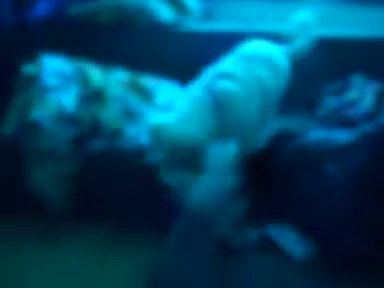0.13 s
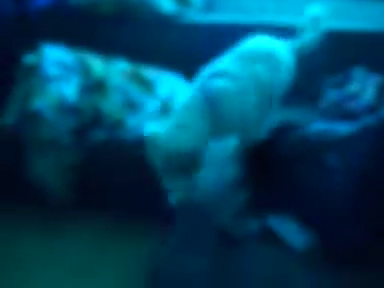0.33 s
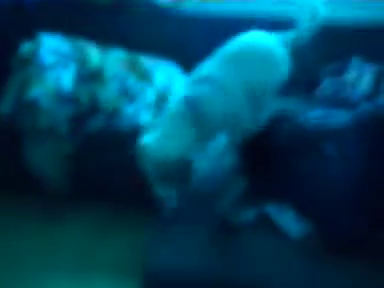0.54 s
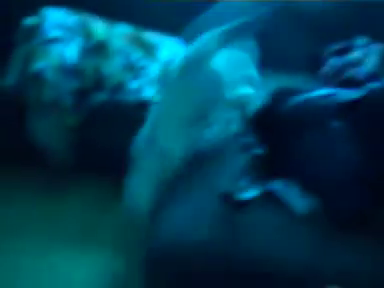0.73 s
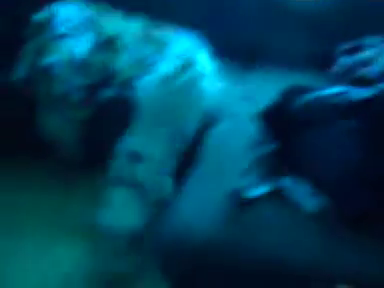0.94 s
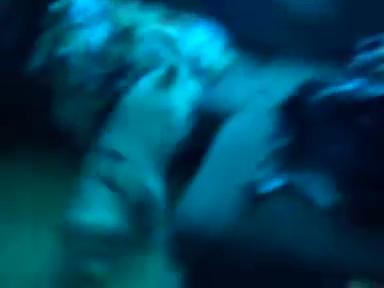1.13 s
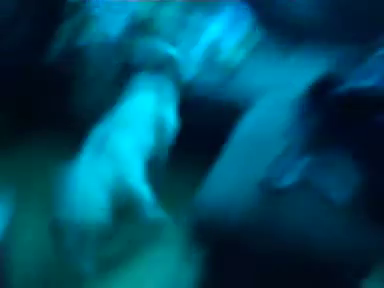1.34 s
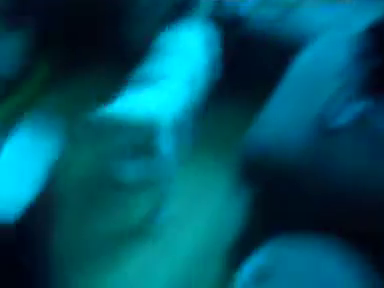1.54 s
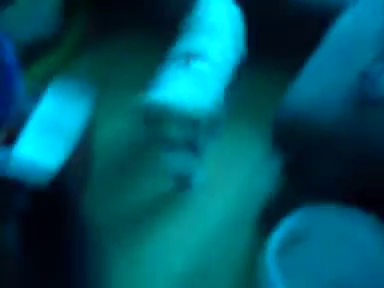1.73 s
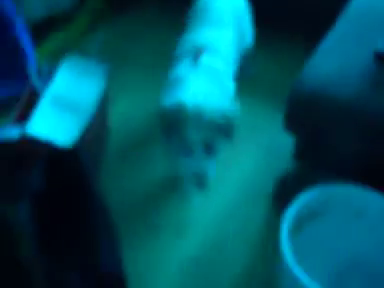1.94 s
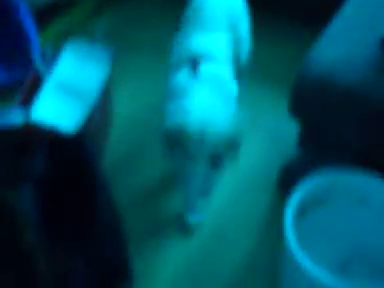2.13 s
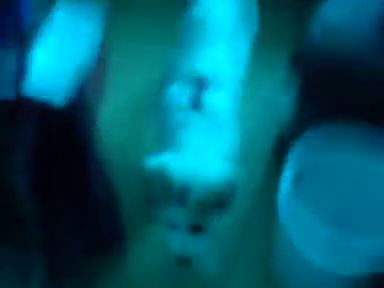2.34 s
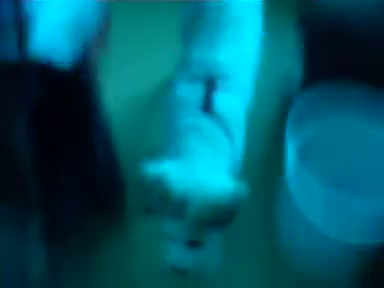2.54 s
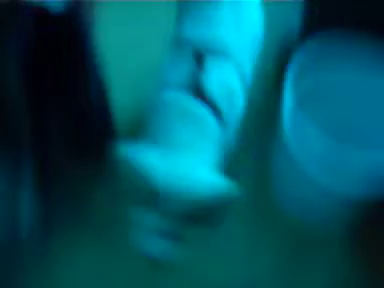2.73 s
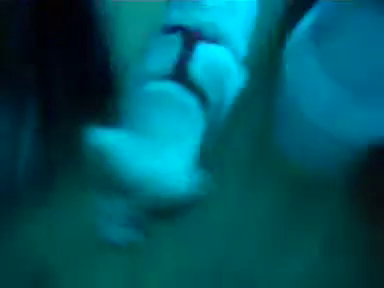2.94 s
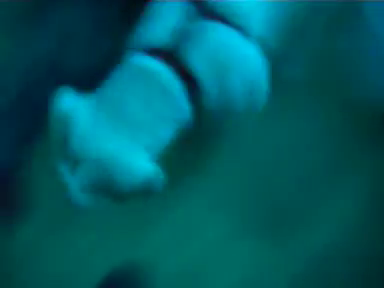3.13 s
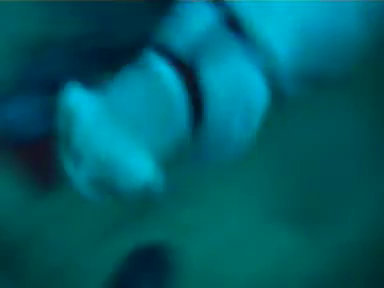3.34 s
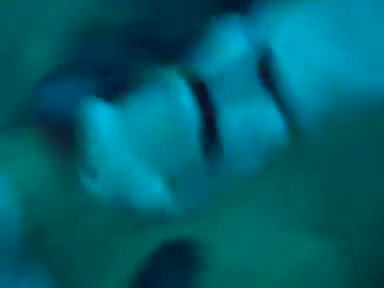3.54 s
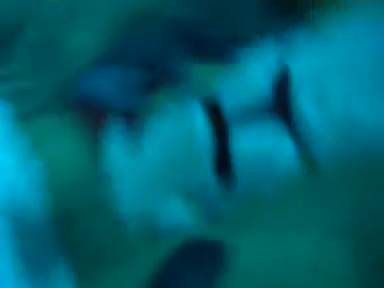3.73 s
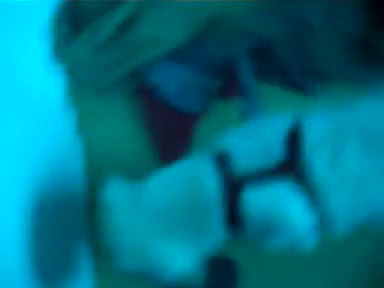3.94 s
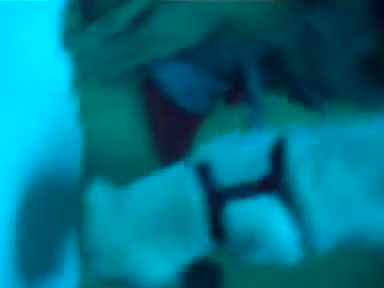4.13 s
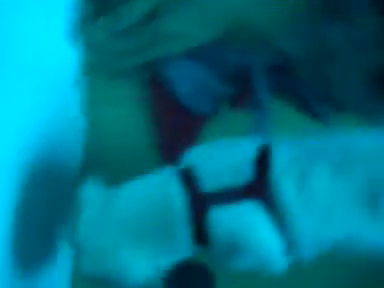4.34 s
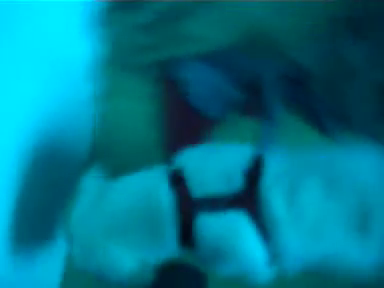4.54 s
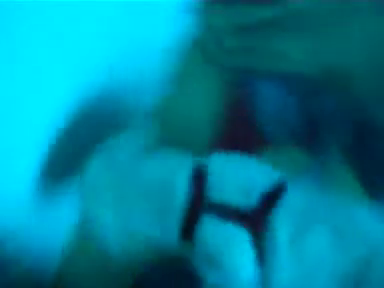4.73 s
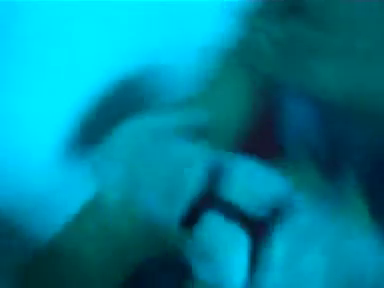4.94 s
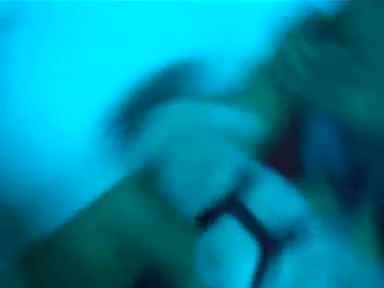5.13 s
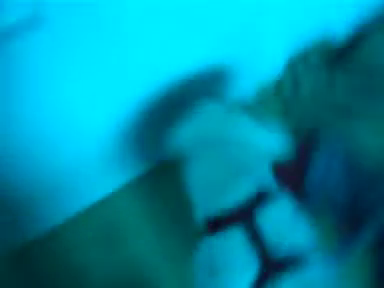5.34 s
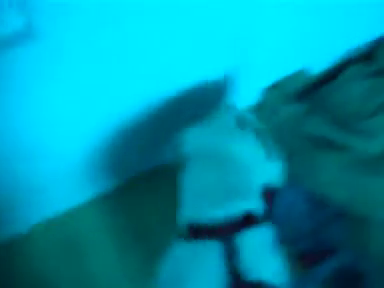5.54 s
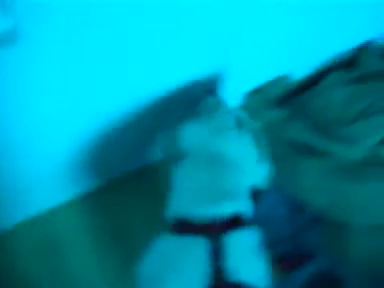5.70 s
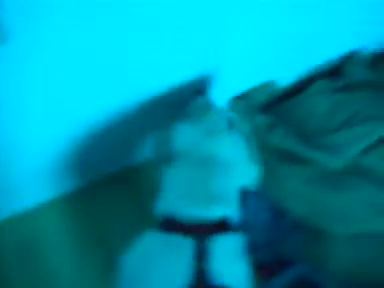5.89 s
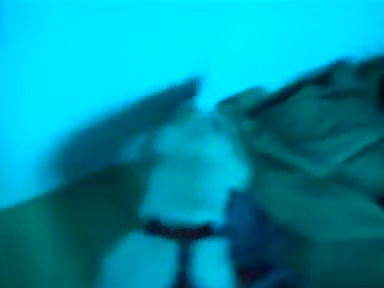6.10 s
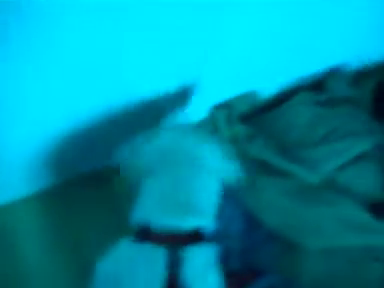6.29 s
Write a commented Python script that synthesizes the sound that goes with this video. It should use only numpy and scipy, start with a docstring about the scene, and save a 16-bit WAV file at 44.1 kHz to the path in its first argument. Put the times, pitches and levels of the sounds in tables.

```python
"""A small dog in a harness scrambles off a sofa, lands on a hard floor and patters about; later it snuffles three times.
Claws and taps are short bursts of noise; thuds, buckle and the knocked recorder case are sums of fading sines.
Cloth, fur and cushion are grainy noise shaped by the dog's motion; snuffles are fluttering noise puffs.
Beneath them lie a faint room hiss, wavering whines and short narrow whirrs."""
import sys
import numpy as np
from scipy import signal
from scipy.fft import rfft, irfft, next_fast_len
from scipy.io import wavfile
from scipy.ndimage import uniform_filter1d

SR = 44100
rng = np.random.default_rng(int(sys.argv[2]) if len(sys.argv) > 2 else 0)


def persist_wave(psi):
    """Save psi, clipped to +-1, as 16-bit WAV."""
    counts = np.round(np.clip(psi, -1, 1) * 32767).astype(np.int16)
    wavfile.write(sys.argv[1], SR, np.atleast_2d(counts).T)


N = 280476
TIME = np.arange(N) / SR   # seconds

# All levels in the tables hold before room echo and the final filters. In colours they are relative.
# Hiss of the still room. Each row: frequency in Hz, level in dB.
HISS_COLOUR = [(15, -61), (25, -32), (200, -16.5), (437, -11.5), (645, -12), (1060, -11.5), (1240, -12),
               (1370, -15), (1820, -17.5), (2020, -16), (3980, -23), (5160, -15.5), (5580, -20),
               (10200, -24), (12500, -28.5), (16200, -34), (22000, -120)]
# Faint wavering whines: two last throughout, the higher ones start later.
# Each row: start in seconds, length in seconds, pitch in Hz, waver in Hz, level in dB.
WHINES = [(0, 6.4, 1273, 17.25, -71.5), (0, 6.4, 1141, 70, -69.5), (2.578, 0.43, 4500, 86, -62.5),
          (2.6, 0.12, 3350, 58, -62), (4.405, 2.3, 4520, 80, -70.5), (5.452, 1.3, 5080, 10.5, -70)]
# Faint narrow whirrs that start and stop.
# Each row: start in seconds, length in seconds, centre in Hz, width of each filter pass in Hz, level in dB.
WHIRRS = [(0, 0.36, 5030, 450, -68), (.4, 0.066, 5150, 450, -58), (0.947, 0.805, 2740, 746, -60),
          (1.3, 0.43, 2120, 400, -62), (1.354, 0.088, 5200, 450, -54), (1.807, 0.11, 5170, 448, -57.5),
          (2.05, 0.056, 5230, 450, -72), (2.403, 0.13, 5170, 450, -55.5), (4.9, 0.29, 2860, 300, -75),
          (4.9, .32, 2180, 250, -85)]
# How briskly the body moves. Each row: time in seconds, briskness in dB (compared with an easy pace).
MOTION = [(0.0, -58.5), (0.3, -56.5), (0.83, -50), (1.24, -49), (2.05, -60.5), (2.14, -58.5), (2.55, -52),
          (2.97, -55), (3.28, -52.5), (3.47, -54), (3.72, -52), (3.93, -44.5), (4.13, -46), (4.32, -52),
          (4.52, -57), (4.92, -51.5), (6.02, -64), (6.36, -62.5)]
# The body brushes past cushion and cloth.
# Each row: start in seconds, length in seconds, rustle level in dB, low rub level in dB.
BRUSHES = [(0.292, 0.047, -51.5, -68), (0.344, 0.047, -46, -61), (0.615, 0.021, -47.5, -44),
           (.685, 0.048, -47.5, -63), (0.733, 0.12, -60.5, -50.5), (0.972, 0.066, -51, -66),
           (1.23, 0.034, -60, -49), (2.013, 0.022, -57, -64), (2.205, 0.045, -56, -59),
           (3.888, 0.065, -49.5, -53), (4.256, 0.029, -45, -86), (4.878, 0.21, -61, -77)]
# Tone colour of the low rub on cushions. Each row: frequency in Hz, level in dB.
CUSHION_COLOUR = [(29, -70), (50, -16.5), (112, -14), (205, -14.5), (272, -7.5), (321, -2.5), (519, 1),
                  (630, 2), (851, -15.5), (959, -4.5), (1800, -7), (2340, -22), (3960, -120)]
# Tone colour of the fine fur rustle. Each row: frequency in Hz, level in dB.
FUR_COLOUR = [(470, -21.5), (800, -0.5), (898, -4), (973, -9.5), (1360, -8.5), (1750, -8.5), (2080, -3.5),
              (2740, -3.5), (6640, -0.5), (8950, -13.5), (10500, -14), (12500, -24.5), (16200, -75),
              (22000, -120)]
# The sofa groans briefly as the dog pushes off.
# Each row: start in seconds, length in seconds, pitch in Hz, waver in Hz, level in dB.
GROANS = [(.715, 0.044, 286.5, 12, -55), (.74, 0.02, 383.6, 23, -53), (.772, .028, 583, 26, -50),
          (.81, 0.061, 283, 21, -54)]
# Claws striking the floor. Each row: time in seconds, peak level in dB, tilt in dB per octave.
CLAWS = [(0.9043, -2.5, 8), (0.9107, -8, -4.5), (0.924, -10, -0.5), (1.244, -4, 0.5), (1.256, 2, 4.5),
         (1.2591, -6.5, -4.5), (1.6442, -25.5, -6), (1.7948, -27.5, -3), (2.0185, -23, -5.5),
         (2.2222, -19.5, -5), (2.6261, -29, -5), (2.6698, -26, -5)]
# Tone colour of the claws. Each row: frequency in Hz, level in dB.
CLAW_COLOUR = [(530, -40), (900, -19), (1210, -49), (1400, -18.5), (2290, -18.5), (2830, -14), (3640, -9.5),
               (3980, -6.5), (5470, -3), (5910, 3.5), (8320, -8.5), (8980, -9), (12500, -22.5),
               (16200, -42), (22000, -120)]
# Duller taps of paws and harness. Each row: time in seconds, peak level in dB, tilt in dB per octave.
TAPS = [(0.5267, -33, -1), (0.5837, -29, -2), (1.1285, -23, 3.5), (1.1484, -38, 4), (1.475, -40, -3),
        (2.4072, -39, 1.5), (2.9599, -38, 3.5), (3.9564, -30, 8), (5.1086, -43, 4), (6.0681, -43, 3),
        (6.1922, -46, 1.5), (6.2307, -46, 13)]
# Tone colour of the taps. Each row: frequency in Hz, level in dB.
TAP_COLOUR = [(400, -3), (700, -2), (1200, 0), (2100, -5.5), (2800, -6), (4000, -6), (7000, -10),
              (12500, -31.5)]
# The buckle knocks as the dog gathers itself to jump. Each row: time in seconds, peak level in dB.
BUCKLE_KNOCKS = [(0.5835, -26)]
# Ringing of the buckle. Each row: pitch in Hz, typical level in dB, time to fade by 60 dB in seconds.
BUCKLE_MODES = [(1800, -2, 0.017), (2110, 8, 0.015), (3230, -4, 0.025), (4350, -5, 0.0093)]
# The dog's weight coming down. Each row: time in seconds, peak level in dB.
THUDS = [(0.586, -40.5), (0.8978, -22.5), (0.906, -28), (0.925, -30), (1.1305, -22), (1.248, -32),
         (1.262, -36.5), (1.277, -32), (1.547, -38.5), (6.028, -55)]
# Ringing of the floor under a paw.
# Each row: pitch in Hz, typical level in dB, time to fade by 60 dB in seconds.
FLOOR_MODES = [(151.6, -25, 0.13), (294, -14.5, 0.043), (380, -6, 0.031), (438, -3.5, 0.044),
               (560, 1, 0.015), (660, -5, 0.033), (980, -6, 0.0078)]
# Cloth catches, snaps free and scrapes on.
# Each row: start in seconds, length in seconds, opening scrape level in dB, peak level of the snap in dB.
SCRATCHES = [(3.045, 0.048, -49.5, -28.5), (3.079, 0.084, -39.5, -16.5), (3.17, 0.028, -36, -15),
             (3.207, 0.036, -39.5, -36), (3.254, .013, -47, -26), (3.3234, 0.013, -36.5, -30),
             (3.4046, 0.022, -43, -27), (3.455, 0.015, -41, -32), (3.513, 0.048, -44.5, -32),
             (3.643, 0.033, -42, -31), (3.692, 0.017, -40, -42), (3.765, 0.028, -48, -27),
             (3.8448, 0.028, -45.5, -31), (4.0267, 0.0076, -44, -29), (4.149, 0.031, -45.5, -36)]
# Tone colour of the scratches. Each row: frequency in Hz, level in dB.
SCRATCH_COLOUR = [(180, -31), (300, -16), (397, -25), (443, -5), (587, -3.5), (1320, -13.5), (2050, -4.5),
                  (2880, -14.5), (4130, -1.5), (5640, 1.5), (6490, 5), (12500, -8.5), (16200, -50),
                  (22000, -120)]
# Cloth lies against the microphone and crackles: start in seconds, length in seconds, level in dB.
CLOTH_CONTACT = (3.05, 1.25, -55)
# Knocks on the recorder's case.
# Each row: time in seconds, peak level in dB, tilt in dB per octave, level of the hollow body in dB.
KNOCKS = [(3.7855, -4, -1, -23), (3.9007, -39, 26, -30), (3.9322, -19, 2.5, -45), (4.0705, -20.5, -6, -37),
          (4.0738, -19, -2.5, -22.5)]
# Tone colour of the knocks' crack. Each row: frequency in Hz, level in dB.
KNOCK_COLOUR = [(410, -15), (700, -8.5), (2280, -14), (2870, -13), (3650, -12.5), (4380, 3), (6060, -6.5),
                (7810, -5), (9700, -19), (10600, -13.5), (12500, -17.5), (16200, -49), (22000, -120)]
# Ringing of the hollow case. Each row: pitch in Hz, typical level in dB, time to fade by 60 dB in seconds.
CASE_MODES = [(342, -2, 0.014), (480, 13.5, 0.02), (750, 3, 0.015), (1034, 0.5, 0.018)]
# The dog's snuffles, puff by puff.
# Each row: start in seconds, length in seconds, attack in seconds, air level in dB, throat level in dB.
SNUFFLES = [(4.545, 0.039, 0.0061, -33.5, -35), (4.604, .011, 0.0035, -41.5, -43),
            (4.805, 0.06, .016, -43.5, -50), (5.241, 0.028, 0.014, -36, -50),
            (5.278, 0.064, 0.017, -38, -45)]
# Tone colour of air in the nose. Each row: frequency in Hz, level in dB.
NOSE_COLOUR = [(350, -38), (600, -14), (648, -17), (708, 7.5), (783, -21), (913, -9), (1130, -4),
               (1250, -2), (1700, -4.5), (2430, -8.5), (3460, -4), (3740, -7.5), (5200, -1.5),
               (9820, -15.5), (12500, -26), (16200, -76), (22000, -120)]
# Hollow ringing of the muzzle. Each row: pitch in Hz, rough overall width in Hz, relative level in dB.
MUZZLE_MODES = [(601, 120, 4.5), (720, 94, 4.5), (1060, 350, -2), (1290, 570, -17.5), (1620, 410, -29)]
# How much the two microphone ports differ, before the direct and diffuse parts get their own levels.
# Each row: frequency in Hz, level in dB against what they share.
PORTS = [(300, -46), (3500, -39), (5000, -18.5), (7000, -2.5), (8300, 4.5), (9400, 10.5), (11000, 6.5),
         (12500, -2.5)]
# Balance of the two sides. Each row: frequency in Hz, left minus right in dB.
LEAN = [(60, 1), (130, 0.5), (280, -0.5), (600, 0.5), (1300, -0.5), (2800, 0.5), (6040, -3), (13000, 4)]

EASY_PACE_DB = -54   # briskness of an easy walk
FUR_DB, FUR_FOLLOWS = -56, 0.99   # rustle level at that pace; dB gained per dB of motion
CUSHION_DB, CUSHION_FOLLOWS = -62.5, 0.7   # the same for the low rub
# Seconds each kind of contact takes to fade by 60 dB
CLAW_RING_S, TAP_RING_S, KNOCK_RING_S, SNAG_RING_S = 0.031, 0.027, 0.014, 0.007
SCRATCH_EASES_DB = 4.5   # a scrape fades by this much as its tension is spent
ROCKING_HZ = 440   # above this the case rocks between the ports more than it pushes on both
WALL_CUT_HZ = 6600   # the walls' reflections dull above this
CUTOFF_HZ = 12600   # steep upper limit of the whole sound


def from_db(db):
    """Turn decibels into gain."""
    return 10 ** (np.asarray(db) / 20)


def rms_one(x):
    """Scale a sound to an average (rms) strength of 1."""
    return x / np.sqrt(np.mean(x ** 2) + 1e-20)


def add(track, s, sound):
    """Mix a sound into a track from time s on."""
    start = max(round(s * SR), 0)
    track[start:start + len(sound)] += sound[:N - start]


def filtered(x, order, hz, kind):
    """Plain smooth filter that keeps the lows or the highs."""
    return signal.sosfilt(signal.butter(order, hz, kind, fs=SR, output="sos"), x + 1e-18)


def coloured(x, spectrum, tilt_db=0, size=4096):
    """Filter without pre-echo (minimum phase): follows a spectrum, tilted per octave, falling off outside."""
    octave = np.log2(np.maximum(np.arange(size // 2 + 1), 0.5) * SR / size)
    points, db = np.log2(np.array(spectrum)[:, 0]), np.array(spectrum)[:, 1]
    outside = np.abs(octave - np.clip(octave, points[0], points[-1]))
    tilt = tilt_db * (octave - points.mean())
    level = np.interp(octave, points, db) + tilt - 18 * outside
    # The cepstrum turns the levels into a response that starts at once
    cepstrum = irfft(np.log(from_db(level)))[:size // 2]
    response = irfft(np.exp(rfft(2 * cepstrum, size) - cepstrum[0]))
    return signal.oaconvolve(x, response)[:len(x)]


def resonance(x, hz, width_hz):
    """Let one pitch ring (two poles), with a gain of about 1 on top."""
    r = np.exp(-np.pi * width_hz / SR)
    feedback = [1, -2 * r * np.cos(2 * np.pi * hz / SR), r * r]
    return signal.lfilter(np.array([1, 0, -1]) * (1 - r * r) / 2, feedback, x + 1e-18)


def drift(rate):
    """Slow random wander with a spread near 1: straight lines between rate random points a second."""
    knots = rng.standard_normal(4000)
    return np.interp(TIME * rate, np.arange(len(knots)), knots)


def grains(per_s, spread_db, smooth):
    """Fibres slipping: random tiny clicks of uneven size over a smooth hiss."""
    sizes = from_db(spread_db * np.minimum(rng.exponential(1, N), 4))
    sizes = sizes * rng.choice([-1, 1], N)
    slips = rng.random(N) < per_s / SR
    return rms_one(sizes * slips) + smooth * rng.standard_normal(N)


def strokes(rows, rise_s, fall_s):
    """Loudness shape of strokes (start, length, dB) that swell, hold and die away."""
    total = 0
    for s, length, db in rows:
        swell = 1 + np.tanh((TIME - s) / rise_s)
        fade = 1 - np.tanh((TIME - s - length) / fall_s)
        total = total + from_db(db) * swell * fade / 4
    return total


def tones(rows, edge_s, waver_per_s):
    """Wavering sine tones (start, length, Hz, waver Hz, dB) with soft edges."""
    total = 0
    for s, length, hz, waver, db in rows:
        cycles = np.cumsum(hz + waver * drift(waver_per_s)) / SR
        tone = rms_one(np.sin(2 * np.pi * cycles))
        total = total + strokes([(s, length, db)], edge_s, edge_s) * tone
    return total


def clicks(rows, spectrum, t60, rise_s, snap, crest_db, size=4096):
    """Hard contacts (time, dB, tilt): one snap amid a cluster of fast-dying vibrations."""
    out, t = np.zeros(N), TIME[:size]
    envelope = (1 - np.exp(-(t / rise_s) ** 2)) * from_db(-60 * t / t60)
    for s, db, tilt_db in rows:
        force = rng.standard_normal(size) * envelope / np.linalg.norm(envelope)
        force[np.argmax(envelope)] += snap
        burst = coloured(force, spectrum, tilt_db)
        # The loudest 2 ms lie crest_db under the stated peak
        loudest = np.sqrt(uniform_filter1d(burst ** 2, size=88).max())
        add(out, s, from_db(db - crest_db) * burst / loudest)
    return out


def blows(rows, modes, vary_db, low_cut_hz, size=16384):
    """Soft blows (time, dB) ring a body's modes at chance strengths; deep bass is not radiated."""
    out, t = np.zeros(N), TIME[:size]
    for s, db in rows:
        ring = np.zeros(size)
        for k, (hz, level, t60) in enumerate(modes):
            strength = from_db(level + vary_db * rng.standard_normal() - 60 * t / t60)
            ring += (-1) ** k * strength * np.sin(2 * np.pi * hz * t)
        add(out, s, from_db(db) * ring / np.abs(ring).max())
    return filtered(out, 3, low_cut_hz, "high")


def scattered(x, t60, gap_s, size=22050):
    """Dense reflections that build up after a short gap and die away; the power is kept."""
    t = TIME[:size]
    build_up = 1 - np.exp(-(t / gap_s) ** 2)
    tail = rng.standard_normal(size) * from_db(-60 * t / t60) * build_up
    return signal.oaconvolve(x, tail / np.linalg.norm(tail))[:N]


def room(x, wet_db, t60, gap_s):
    """Direct sound plus the walls' reflections, which lose the highest treble."""
    dulled = filtered(x, 2, WALL_CUT_HZ, "low")
    return x + from_db(wet_db) * scattered(dulled, t60, gap_s)


def widened(mid, side):
    """Left and right from what they share and what they do not."""
    return np.array([mid + side, mid - side])


def still_room():
    """Even noise makes the hiss, wider in the bass; a few wavering sines whine faintly in it."""
    mid = rms_one(coloured(rng.standard_normal(N), HISS_COLOUR))
    side = rms_one(coloured(rng.standard_normal(N), HISS_COLOUR, tilt_db=-0.8))
    whines = tones(WHINES, edge_s=0.032, waver_per_s=150)
    return widened(from_db(-64.5) * mid + whines, from_db(-66.5) * side)


def whirring():
    """Noise squeezed twice through a resonance gives thin bands in short runs, like a small lens motor."""
    noise, total = rng.standard_normal(N), 0
    for s, length, hz, width, db in WHIRRS:
        band = rms_one(resonance(resonance(noise, hz, width), hz, width))
        total = total + band * strokes([(s, length, db)], rise_s=0.008, fall_s=0.0091)
    return total


def rubbing():
    """Slipping fibres give a lumpy low rub and a fine fur rustle, both growing with motion; the sofa groans."""
    effort_db = np.interp(TIME, *np.transpose(MOTION)) - EASY_PACE_DB
    low = rms_one(coloured(grains(per_s=400, spread_db=2.5, smooth=0.88), CUSHION_COLOUR))
    low = low * from_db(0.57 * drift(35))
    fine = rms_one(coloured(grains(per_s=3000, spread_db=3.0, smooth=1.7), FUR_COLOUR))
    fine = fine * from_db(2.5 * drift(50))
    rubs = [(s, length, db) for s, length, _, db in BRUSHES]
    rustles = [row[:3] for row in BRUSHES]
    pressure = from_db(CUSHION_DB + CUSHION_FOLLOWS * effort_db)
    pressure = pressure + strokes(rubs, rise_s=0.0054, fall_s=0.013)
    speed = from_db(FUR_DB + FUR_FOLLOWS * effort_db)
    speed = speed + strokes(rustles, rise_s=0.014, fall_s=0.0058)
    return pressure * low + speed * fine + tones(GROANS, edge_s=0.01, waver_per_s=59)


def footfalls():
    """Hard claws and taps burst, weight rings the floor, all echoing in the room; the buckle rings dry."""
    claws = clicks(CLAWS, CLAW_COLOUR, CLAW_RING_S, rise_s=0.000904, snap=0.26, crest_db=12.5)
    taps = clicks(TAPS, TAP_COLOUR, TAP_RING_S, rise_s=0.0007, snap=0.21, crest_db=5.5)
    buckle = blows(BUCKLE_KNOCKS, BUCKLE_MODES, vary_db=1, low_cut_hz=440)
    thuds = blows(THUDS, FLOOR_MODES, vary_db=2.5, low_cut_hz=197)
    hard = room(claws + taps, wet_db=-2.5, t60=0.18, gap_s=0.0072)
    soft = room(thuds, wet_db=-4.0, t60=0.19, gap_s=0.0049)
    return buckle + hard + soft


def scratching():
    """Coarse cloth right at the microphone: each scratch opens with a snap and eases off in clumps of grit."""
    clumped = grains(per_s=1500, spread_db=3.0, smooth=0.57) * from_db(2.4 * drift(120))
    grit = rms_one(coloured(clumped, SCRATCH_COLOUR))
    tension = np.zeros(N)
    for s, length, db, _ in SCRATCHES:
        easing = from_db(-SCRATCH_EASES_DB * np.clip((TIME - s) / length, 0, 1))
        tension += strokes([(s, length, db)], rise_s=0.0073, fall_s=0.0027) * easing
    snaps = [(s, db, 0) for s, _, _, db in SCRATCHES]
    snags = clicks(snaps, SCRATCH_COLOUR, SNAG_RING_S, rise_s=0.00055, snap=0.99, crest_db=11)
    threads = grains(per_s=260, spread_db=2.5, smooth=0.4)
    crackle = rms_one(coloured(threads, SCRATCH_COLOUR, tilt_db=0.5))
    crackle = crackle * strokes([CLOTH_CONTACT], rise_s=0.004, fall_s=0.022)
    scratch = room(grit * tension + snags + crackle, wet_db=-13, t60=0.22, gap_s=0.006)
    # Each port hears these two bands its own way
    uneven = from_db(6.5) * resonance(scratch, 750, 930) + from_db(7.5) * resonance(scratch, 10600, 2200)
    return widened(scratch, scattered(uneven, t60=0.0071, gap_s=0.00017))


def handling():
    """Knocks travel through the case: a crack with little echo and a hollow body that rocks between the ports."""
    cracks = [row[:3] for row in KNOCKS]
    crack = clicks(cracks, KNOCK_COLOUR, KNOCK_RING_S, rise_s=0.0005, snap=0.9, crest_db=9.5)
    body_blows = [(s, body_db) for s, _, _, body_db in KNOCKS]
    body = blows(body_blows, CASE_MODES, vary_db=1, low_cut_hz=360)
    rocking = np.gradient(body) * SR / (2 * np.pi * ROCKING_HZ)   # grows with pitch
    uneven = from_db(-0.5) * resonance(crack, 1200, 1200) + from_db(8) * resonance(crack, 9500, 1500)
    mid = room(crack, wet_db=-15, t60=0.14, gap_s=0.016) + body
    return widened(mid, rocking + scattered(uneven, t60=0.0063, gap_s=0.00018))


def snuffling():
    """Air jets through the dog's nostrils, fluttering, and rings the hollow of its muzzle."""
    air = rng.standard_normal(N) * from_db(2 * drift(220))
    puffs = sum(strokes([(s, length, db)], rise_s=attack, fall_s=0.017)
                for s, length, attack, db, _ in SNUFFLES)
    jet = rms_one(coloured(air, NOSE_COLOUR)) * puffs
    # Two passes narrow a band, so each pass is made 1.4 times wider
    hollow = rms_one(sum(from_db(db) * resonance(resonance(air, hz, 1.4 * width), hz, 1.4 * width)
                         for hz, width, db in MUZZLE_MODES))
    throat_puffs = [(s, length, db) for s, length, _, _, db in SNUFFLES]
    hollow = hollow * strokes(throat_puffs, rise_s=0.0023, fall_s=0.0099)
    return room(jet + hollow, wet_db=-9.5, t60=0.15, gap_s=0.0018)


def scene():
    """All sources, picked up by two ports that agree in the bass and part ways in the treble."""
    sound = still_room() + whirring() + rubbing() + footfalls() + scratching() + handling() + snuffling()
    mid, size = sound.mean(axis=0), next_fast_len(N + 4096)
    hz = np.arange(size // 2 + 1) * SR / size
    apart_db, lean_db = [np.interp(hz, *np.transpose(table)) for table in (PORTS, LEAN)]
    direct = from_db(-7.5) * 1j * rfft(mid, size)   # 1j shifts by a quarter cycle
    diffuse = from_db(-9.5) * rfft(scattered(mid, t60=0.025, gap_s=0.000384), size)
    ports = rfft(sound, size) + widened(0, from_db(apart_db) * (direct + diffuse))
    return irfft(ports * from_db(widened(0, lean_db / 2)), size)[:, :N]


def record(dry):
    """Full scale limits the peaks; then the top is cut steeply."""
    top_cut = signal.ellip(12, 0.1, 70, CUTOFF_HZ, fs=SR, output="sos")
    return signal.sosfilt(top_cut, np.clip(dry, -1, 1))


dry = scene()
out = record(dry)
persist_wave(out)
```